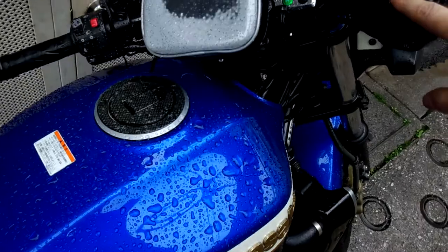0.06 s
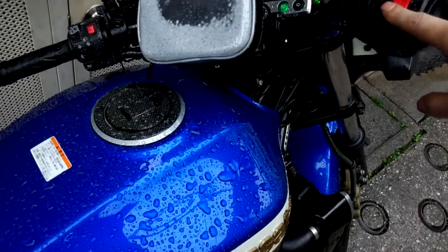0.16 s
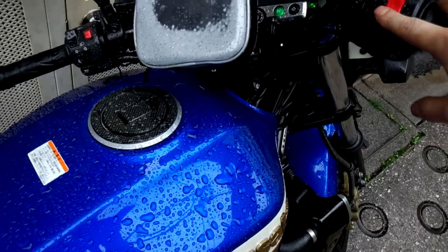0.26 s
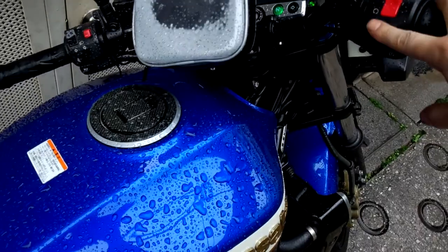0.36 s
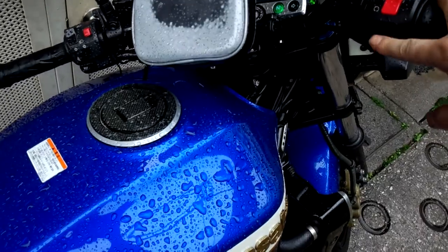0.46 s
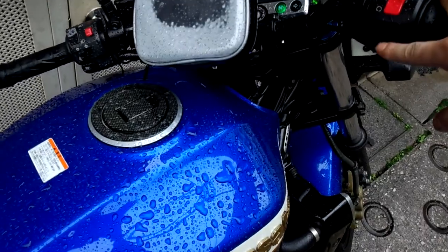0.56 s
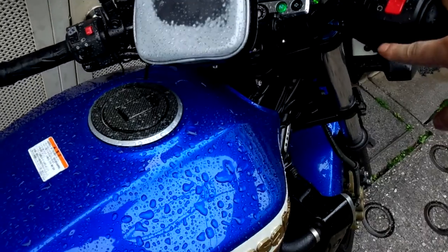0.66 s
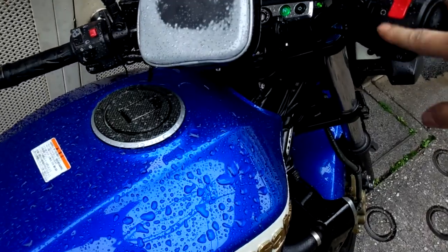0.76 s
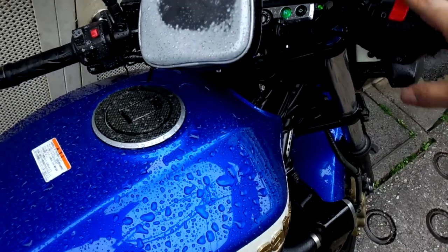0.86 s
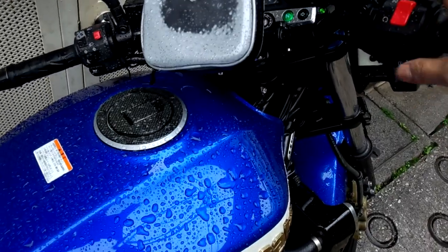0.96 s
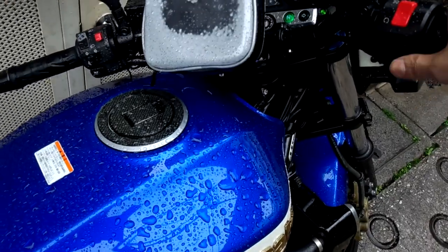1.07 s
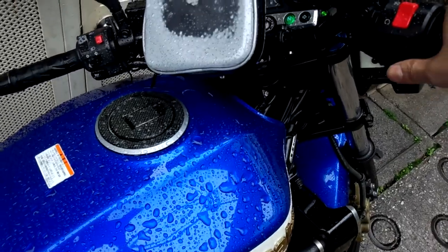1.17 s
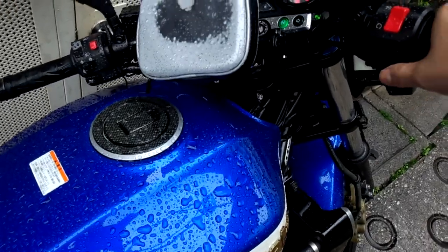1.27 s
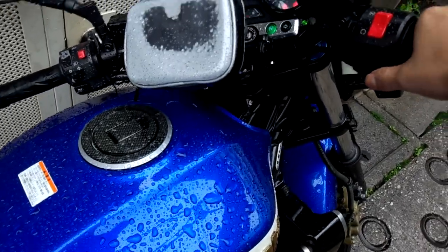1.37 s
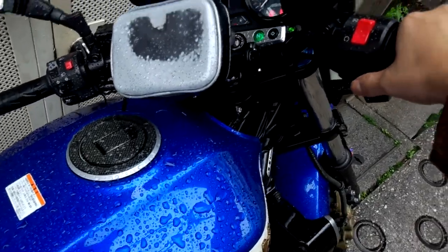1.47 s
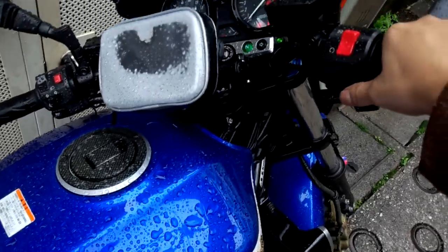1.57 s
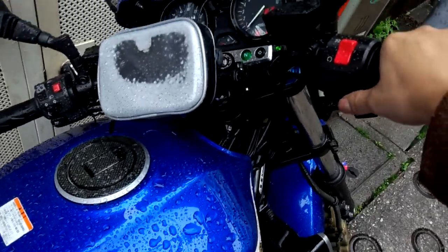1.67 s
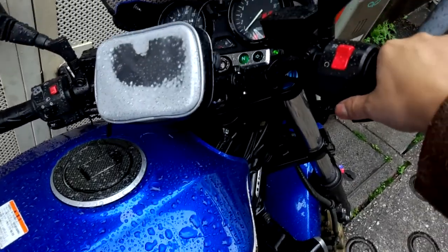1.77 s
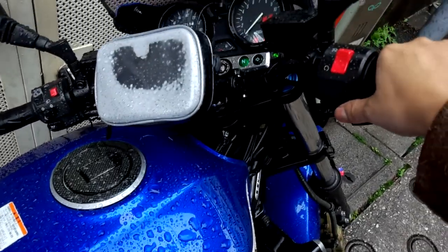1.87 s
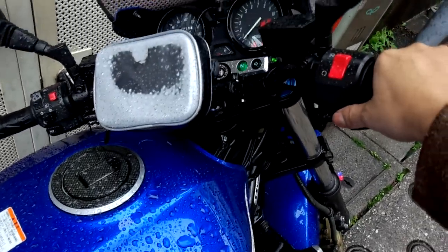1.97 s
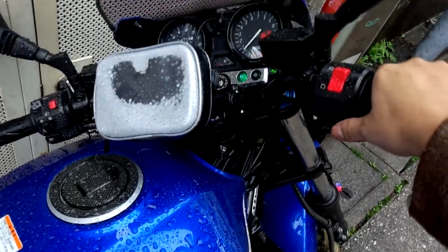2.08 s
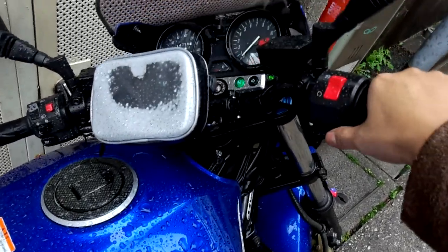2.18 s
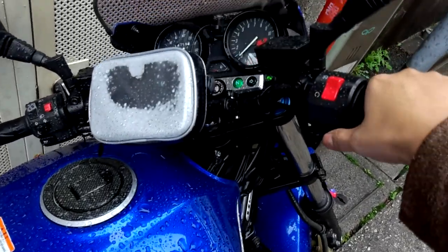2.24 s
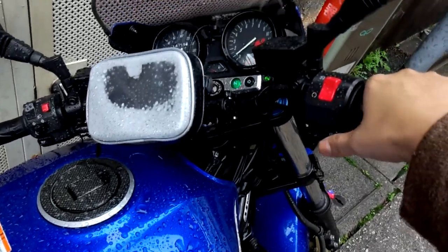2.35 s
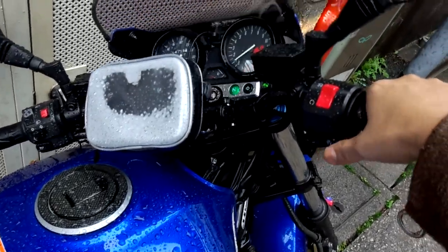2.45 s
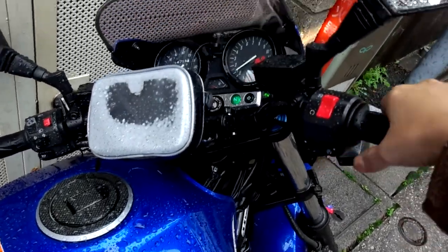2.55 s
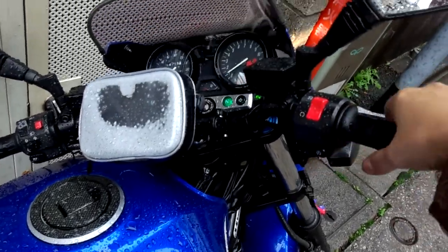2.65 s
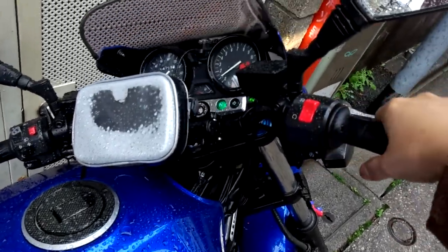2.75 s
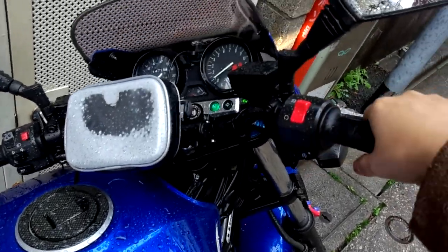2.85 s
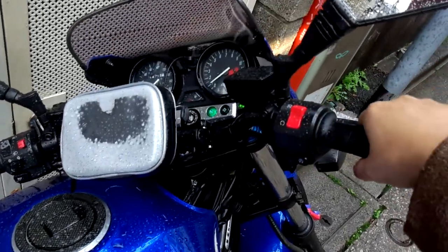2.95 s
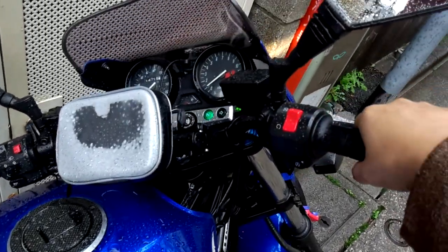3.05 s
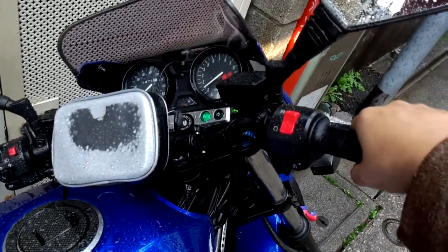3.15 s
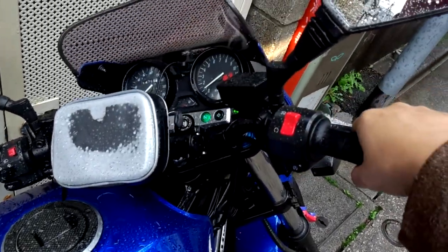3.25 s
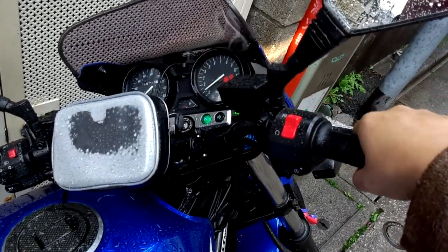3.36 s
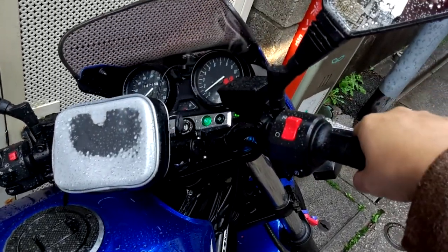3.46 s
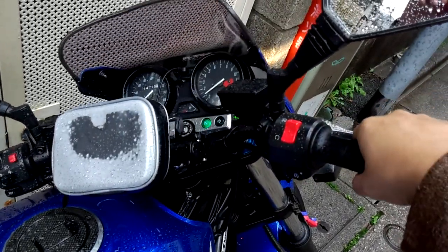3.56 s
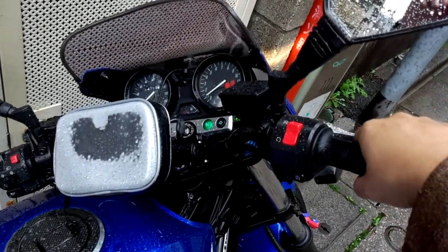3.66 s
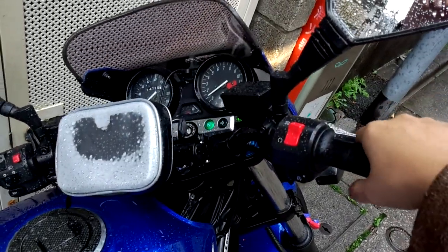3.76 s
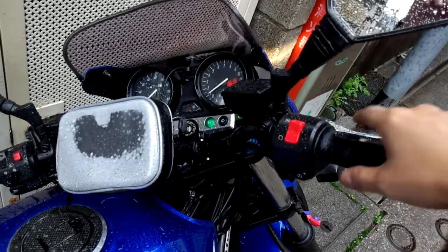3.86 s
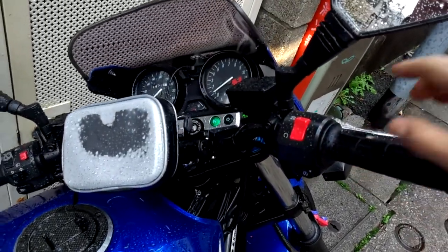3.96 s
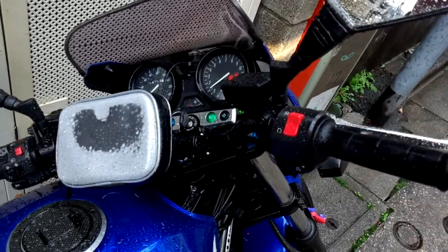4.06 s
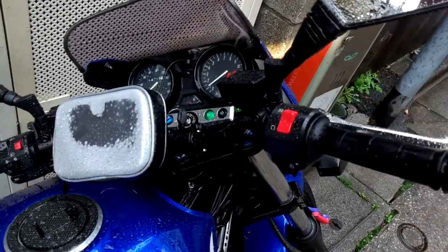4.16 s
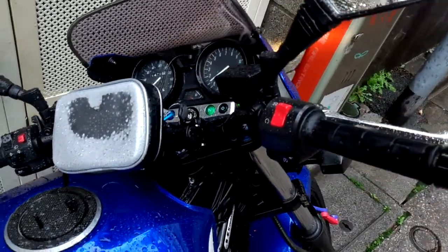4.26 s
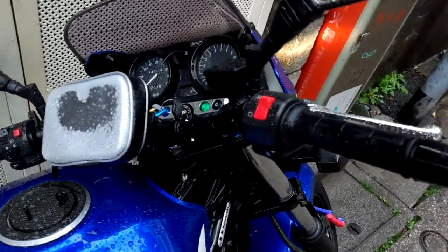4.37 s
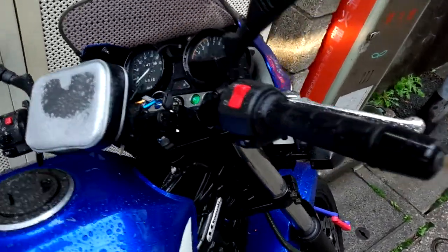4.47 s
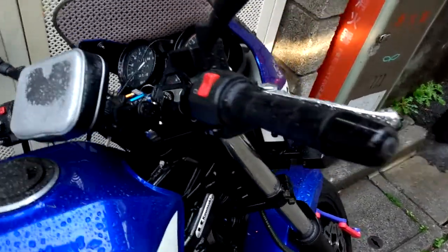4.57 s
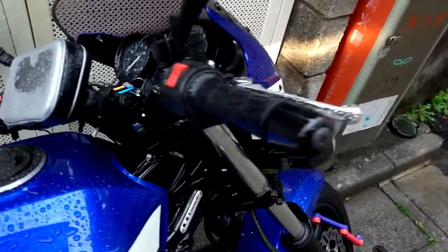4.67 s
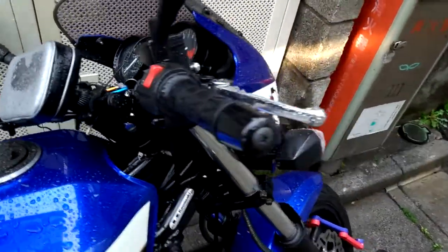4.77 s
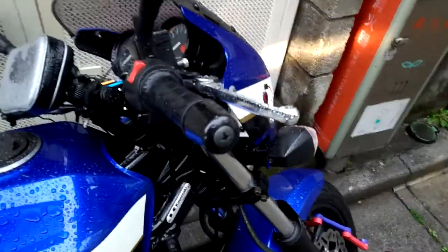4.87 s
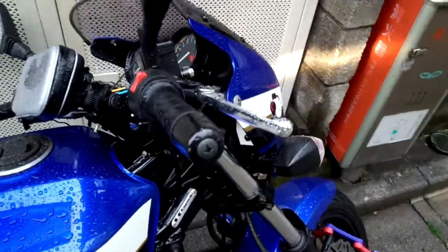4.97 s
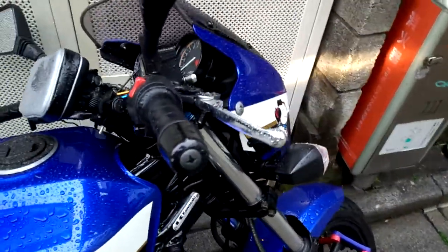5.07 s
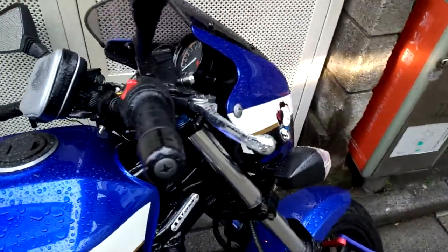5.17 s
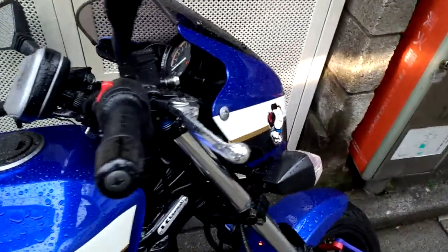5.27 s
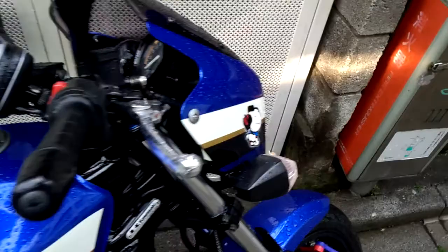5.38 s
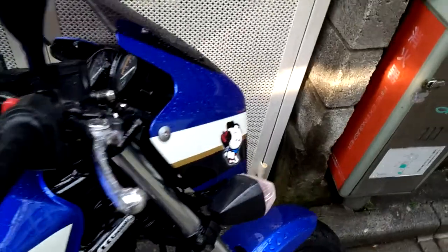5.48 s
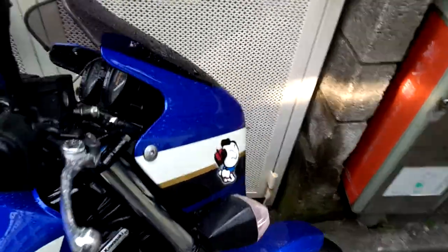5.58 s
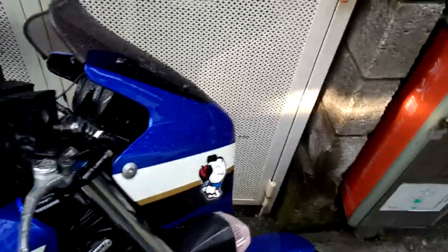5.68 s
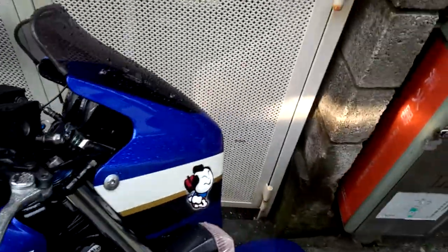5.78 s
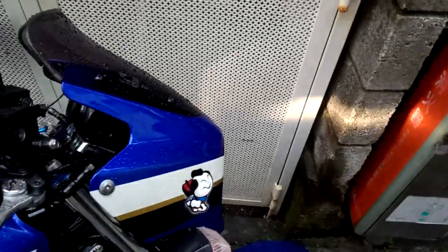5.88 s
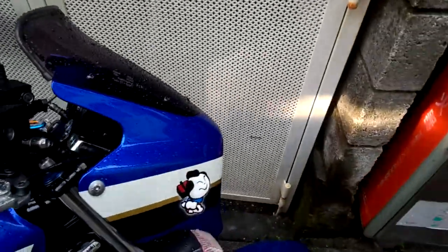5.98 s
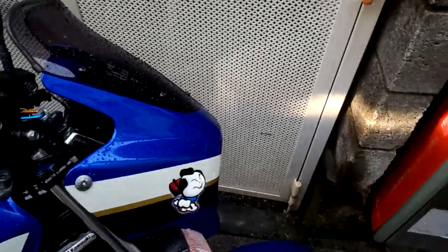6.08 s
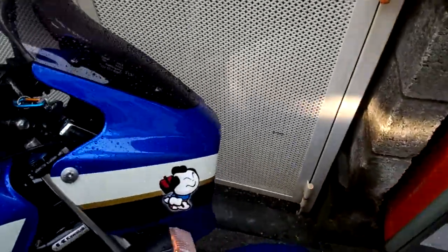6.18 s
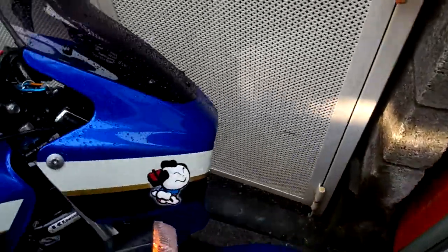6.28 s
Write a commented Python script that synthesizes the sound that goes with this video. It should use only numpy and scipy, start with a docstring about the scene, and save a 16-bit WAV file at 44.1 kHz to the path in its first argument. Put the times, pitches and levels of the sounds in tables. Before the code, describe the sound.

A switch clicks, a starter grinds and squeals briefly, and a cold motorcycle engine catches and idles lumpily with metallic clatter.

```python
"""Cold motorcycle start

A thumb clicks a handlebar switch over the rumble of far traffic. The starter grinds and squeals as
it forces the pistons round, and a cold four-cylinder engine catches and idles lumpily in a narrow
yard. Its firings puff gas down the pipe and shake the metal parts. The microphone moves from the
tank towards the front, and a phone's limiter turns the sound down on the strongest exhaust beats."""
import sys
import numpy as np
from scipy import signal
from scipy.fft import rfft, irfft
from scipy.io import wavfile
from scipy.ndimage import uniform_filter1d

SR = 44100
rng = np.random.default_rng(int(sys.argv[2]) if len(sys.argv) > 2 else 0)


def materialize(psi):
    """Save the field psi as 16-bit PCM at rate SR to the path in sys.argv[1].

    A 1-D psi becomes a single channel; in a 2-D psi each row is a channel.
    """
    bounded = np.clip(np.atleast_2d(psi).T, -1, 1)
    quanta = np.round(bounded * 32767).astype(np.int16)
    wavfile.write(sys.argv[1], SR, quanta)


N = 279153
T = np.arange(N) / SR

# Background loudness: (time [s], rumble [dB], hiss [dB])
YARD_LEVELS = [(.02, -39.5, -48.5), (.085, -37, -48.5), (.1, -52, -45), (.2, -39, -46), (.39, -39, -53),
               (1.15, -39.5, -53), (1.16, -39.5, -49.5), (1.2, -38.5, -52), (1.53, -37.5, -51),
               (1.6, -45, -57), (1.9, -38.5, -73)]
# Tone colour of the traffic and of the hiss: (frequency [Hz], relative level [dB])
RUMBLE_COLOUR = [(11, -64), (18, -1.5), (106, -4), (151, -12), (189, -12), (398, -17.5), (432, -23.5),
                 (640, -24.5), (695, -25), (928, -28), (2500, -43), (3250, -92), (5500, -120)]
HISS_COLOUR = [(470, -50), (800, -4), (1920, -6.5), (4650, -6), (5200, -7.5), (5970, -4), (6680, -5),
               (7290, -5), (9830, -7.5), (10200, -10.5), (15800, -14.5)]
# Switch and relay clicks: (time [s], level [dB], snap pitch [Hz], change to notes under 5 kHz [dB],
# push of air [dB], ringing against the snap [dB])
CLICKS = [(.088, -3.5, 6300, -2.5, -19, -1.5), (0.957, -28, 8700, -25, -70, -5),
          (1.043, -35, 8400, -21, -70, 2), (1.0667, -19, 9250, -25, -70, -12),
          (1.0669, -35, 5900, -25, -70, -12), (1.0669, -28, 2950, -20, -70, -10),
          (1.0715, -34, 3500, -15, -72, -8), (1.081, -35, 4870, 0, -72, 0),
          (1.157, -24.5, 9600, -22, -70, -3), (1.548, -10, 6460, -31, -19, 8),
          (5.4738, -11, 3700, -9, -68, -20), (5.474, -4.5, 7660, -5, -68, -16)]
# Notes of the plastic housing: (pitch [Hz], relative level [dB], time to fade by 60 dB [s])
HOUSING_NOTES = [(1010, -2.5, 0.029), (1235, 3.5, 0.02), (2080, 6.5, 0.0057), (4550, 8, 0.017),
                 (5880, -4, 0.026), (7060, -28, 0.017), (8140, -19, 0.0099)]
# The starter strains at each piston:
# (time [s], relative grind [dB], brush hiss [dB], hiss rise time [s], hiss fall [dB/s])
STROKES = [(1.547, -26.5, -25.5, 0.0087, 300), (1.612, -28.5, -22, 0.041, 350),
           (1.665, -31.5, -22.5, 0.0094, 320), (1.75, -35, -35.5, 0.14, 106),
           (1.814, -30, -20, 0.0056, 550), (1.91, -31.5, -21, 0.014, 800), (1.97, -41, -39, .02, 194)]
# Where the starter gears ring: (pitch [Hz], width [Hz], relative level [dB])
GEAR_BANDS = [(560, 75, -10), (1240, 360, 6), (1575, 400, -4), (2090, 120, -7), (2820, 2800, -1)]
# Tone colour of the motor's sliding brushes: (frequency [Hz], relative level [dB])
BRUSH_COLOUR = [(1470, -38), (2500, -11), (3310, -20), (3720, -4), (4620, -25), (5270, -9), (8140, -1.5),
                (8730, 3.5), (9360, -1.5), (12200, -4), (16000, -61)]
# Air pumped by the pistons: (time [s], level [dB])
THUD_LEVELS = [(1.55, -51), (1.612, -34), (1.65, -27.5), (1.687, -56), (1.8, -25), (1.843, -53),
               (1.909, -34), (1.933, -33.5)]
# Squeals of the starter's small gear: (start [s], length [s], first pitch [Hz], last pitch [Hz],
# glide [s], level [dB], loudest point [share of length], overtones against the main tone [dB])
SQUEALS = [(1.562, 0.018, 1265, 1270, .01, -17, .5, -30), (1.569, 0.031, 1306, 1710, 0.019, -26, .7, -30),
           (1.662, 0.057, 1438, 1250, 0.023, -18.5, 0.48, -16.5),
           (1.81, 0.03, 1464, 1230, 0.0173, -21.5, 0.49, -27),
           (1.893, 0.028, 1240, 1546, 0.013, -23.5, 1, -28)]
# Gear whistles: (start [s], length [s], pitch [Hz], level [dB])
WHISTLES = [(1.606, 0.026, 2230, -26), (1.608, 0.024, 1695, -30), (1.608, 0.025, 1122, -32),
            (1.593, .014, 2050, -31), (1.61, .06, 535, -42), (1.66, .02, 2120, -31),
            (1.734, 0.024, 3780, -34), (1.814, .014, 2170, -30), (1.832, 0.016, 2150, -28),
            (1.822, .012, 3780, -33), (1.965, 0.025, 3800, -36)]
# The microphone's path: (time [s], place [0 = tank, 1 = front])
MIC_PATH = [(2.0, 0.098), (4.1, 0.21), (4.7, 0.7), (5.4, 0.84), (6.3, 0.6)]
# A lope is one lurch of the idle, about eight firings. Each has its own boosts; the last row ends them:
# (start [s], throb [dB], firing tone [dB], pipe ring [dB], burble [dB])
LOPES = [(1.928, -5, -4.5, 4.5, 3.5), (2.143, -1, -4.5, 0, -1), (2.326, 2, 1.5, 3.5, -1.5),
         (2.531, -7.5, -11, 5, -3), (2.599, -4, -0.5, -1.5, -2), (2.81, 0, 2, 0.5, -0.5),
         (3.022, 1, 0, 2, 0.5), (3.227, 0.5, -1, 0, 2.5), (3.43, 2, -0.5, 2.5, 1.5),
         (3.635, 3, 1.5, 1, 1.5), (3.838, 4.5, 0.5, 4, 2), (4.049, 2.5, 1, 2.5, 4), (4.247, 1.5, 0, 1.5, 2),
         (4.447, 0, -1.5, -0.5, -0.5), (4.646, 1.5, 0, -4, 5), (4.858, 0.5, 1, -4, 4),
         (5.075, 1.5, 2, -7, 4.5), (5.283, 2, 2.5, -2, 7), (5.503, 1, -0.5, -2.5, 3.5),
         (5.689, 1, -4, -12, 2), (5.897, -7, -6, -7, 0), (6.112, -3, -5.5, -4.5, 0), (6.32, -7, 0, -3, -2)]
# The shape of one lope soon after catching and once the idle settles: (time into it [s], throb [Hz],
# firing tone [Hz], throb [dB], firing tone [dB], pipe ring [dB], burble [dB], clatter boost [dB])
LOPE_EARLY = [(0, 35, 77.5, -23.5, -21, -19.5, -27.5, 1.7), (.02, 35, 76.5, -25, -31, -24.5, -31.5, -0.3),
              (.045, 32.6, 78.3, -15, -15.5, -24.5, -27, 3),
              (.075, 38.7, 81.96, -17, -18.5, -22.5, -28.5, 3.5),
              (.105, 45.2, 82, -20.5, -21, -27.5, -21.5, 2.6), (.135, 45, 86, -25, -19.5, -28, -26.5, 1),
              (.16, 42.2, 81.5, -17.5, -17, -30, -32, 0), (.185, 39.8, 81.1, -14, -22.5, -27.5, -36.5, -3)]
LOPE_SETTLED = [(0, 35, 81.5, -24, -29.5, -20.5, -49, 0.5),
                (.02, 34.7, 79.4, -16.5, -26.5, -20.5, -36.5, -1),
                (.05, 29.8, 77, -14.5, -17, -22.5, -29.5, 6), (.08, 34.4, 79.07, -19.5, -16, -38, -30, 5),
                (.105, 40.4, 79.33, -18.5, -16, -20, -28.5, 5),
                (.135, 41.5, 81.5, -25.5, -19, -29, -29, 0.5),
                (.16, 40.5, 82.53, -21, -17, -19.5, -29.5, 3),
                (.185, 42.4, 82.05, -24.5, -18, -22.5, -34, 1.1)]
# The pipe's ring as the engine catches: (time [s], pitch [Hz], level [dB])
FIRST_BURNS = [(1.95, 96, -15), (1.975, 124, -27), (1.99, 127, -17), (2.015, 109, -29), (2.044, 107, -24),
               (2.06, 106.3, -20), (2.084, 103, -16.5), (2.138, 109, -32), (2.166, 106, -18.5),
               (2.19, 109, -28.5), (2.236, 107, -17.5), (2.276, 102, -22), (2.32, 103.5, -15.5)]
# The cold engine stumbles: (time [s], half length [s], dip [dB])
MISFIRES = [(2.13, 0.038, -9), (2.342, 0.023, -9), (2.509, 0.028, -16.5)]
# Tone colour of the puffs at the tank and at the front: (frequency [Hz], relative level [dB])
PUFF_COLOUR_TANK = [(74, -17.5), (125, -5), (146, -9), (200, -5.5), (250, -7), (295, -7.5), (357, -23),
                    (407, -19), (454, -32.5), (538, -32), (800, -31.5), (1040, -49), (1760, -120)]
PUFF_COLOUR_FRONT = [(100, -0.5), (175, 1), (215, -5), (245, -15), (295, -17), (340, -16), (405, -21.5),
                     (529, -29), (751, -53), (800, -62), (1040, -58), (1760, -120)]
# Relative clatter loudness, heard from a moving hand: (time [s], cases [dB], valves [dB])
CLATTER_LEVELS = [(1.93, -43, -40), (2.14, -39, -34.5), (2.3, -40.5, -37.5), (2.63, -42, -41),
                  (4.12, -39, -36.5), (4.39, -37.5, -35.5), (4.55, -40, -39.5), (4.69, -36.5, -38),
                  (4.85, -37, -37), (5.2, -36.5, -36), (5.32, -33.5, -34), (5.52, -35, -38),
                  (5.95, -40.5, -42), (6.33, -38.5, -42.5)]
# Where the engine cases ring: (pitch [Hz], width [Hz], weight at tank [dB], weight at front [dB])
CASE_BANDS = [(565, 300, 4.5, -3.5), (946, 32, -22, -0.5), (1156, 404, 8, 1), (1496, 330, -0.5, 2),
              (1850, 105, -7, -0.5), (2120, 180, -8, -1), (2340, 110, -24.5, 1), (3250, 1300, 12, -59)]
# Where the valve parts ring: (pitch [Hz], width [Hz], relative level [dB])
VALVE_BANDS = [(4440, 2000, 1), (6570, 2200, -1.5), (8235, 690, 3.5), (8794, 170, 2.5), (12350, 2800, 4.5)]
# A cover rings in flares: (time [s], relative level [dB], pitch [Hz])
COVER_FLARES = [(1.98, -40, 3860), (2.0, -38.5, 3780), (2.13, -36, 3900), (2.16, -33, 3920),
                (2.24, -37, 3900), (2.31, -45, 3970), (2.42, -34, 3920), (2.45, -50, 3970),
                (2.52, -42, 3960), (2.85, -43.5, 3690), (2.92, -35, 3930), (3.0, -50, 3820),
                (3.03, -35, 3800), (3.2, -45, 3870), (3.26, -40, 3880), (3.72, -42.5, 3803),
                (3.77, -31, 3900), (3.82, -48, 3940), (3.93, -33, 3880), (4.04, -41, 3900),
                (4.06, -35, 3830), (4.28, -41, 3990), (4.39, -31.5, 3770), (4.58, -36, 3780),
                (4.6, -44, 3700), (4.71, -31.5, 3800), (4.73, -46, 3850), (4.81, -49, 3750),
                (4.91, -32, 3840), (4.92, -36, 3680), (5.11, -33.5, 3780), (5.25, -35, 3940),
                (5.32, -30.5, 3600), (5.41, -37, 3900), (5.54, -36.5, 3740), (5.71, -44, 3830),
                (5.74, -37, 3790), (5.92, -48, 3900), (5.94, -42, 3900), (6.14, -51, 3680),
                (6.17, -37.5, 3840), (6.33, -46, 4000)]
# The loudest metal knocks: (time [s], level [dB], pitch [Hz])
KNOCKS = [(1.985, -28, 422), (2.04, -30, 400), (2.28, -32, 1110), (2.305, -30, 1465), (2.4947, -28.5, 1530),
          (2.5548, -35, 1930), (2.582, -29, 1340), (2.705, -32, 1220), (2.7608, -29, 1680),
          (2.812, -27, 1370), (2.8419, -31, 1590), (2.915, -29, 1280), (2.9711, -30, 1320),
          (3.021, -29, 1020), (3.1273, -30, 1280), (3.1774, -33, 1020), (3.331, -31, 1210),
          (3.3833, -25, 1525), (3.416, -31, 1820), (3.486, -30, 960), (3.5356, -26, 1170),
          (3.581, -29, 1000), (3.741, -24.5, 1240), (3.79, -27, 1830), (3.945, -31, 1260),
          (4.0003, -23, 1510), (4.154, -24, 1500), (4.2315, -20.5, 1530), (4.353, -22.5, 1190),
          (4.4055, -20.5, 1570), (4.5025, -21, 1420), (4.555, -27, 1135), (4.6475, -25, 1820),
          (4.681, -28, 1830), (4.74, -32, 1440), (4.9896, -22, 1500), (5.065, -23, 1910),
          (5.245, -27, 2080), (5.11, -27, 1800), (5.1577, -29, 2420), (5.1813, -22.5, 1470),
          (5.2044, -23, 1160), (5.2899, -23, 1900), (5.3152, -22, 1430), (5.556, -25, 1510),
          (5.572, -26, 925), (5.73, -28, 1900), (5.8997, -27, 1650), (6.1098, -30, 1880)]
# Sharp exhaust pops: (time [s], relative level [dB])
POPS = [(2.253, -39), (2.305, -32), (2.358, -30), (2.584, -29), (2.684, -41), (2.795, -38), (3.588, -25),
        (3.793, -25), (4.232, -27), (5.077, -24), (5.113, -24), (5.209, -35), (5.669, -33), (6.171, -33)]

CRANK_ON_S, CRANK_OFF_S = 1.542, 2.0
CATCH_S, BUILD_S = 1.93, 0.055  # the first burn; time the exhaust takes to build
LOPE_S = 0.2  # shorter lopes are squeezed to fit
THROB_BEAT_S, FIRING_BEAT_S, RING_BEAT_S = 0.059, 0.0875, 0.03693  # each tone's strong beat in a lope
LIMIT_DB, RECOVERY_DB_PER_S, TREBLE_EDGE_HZ = -11.7, 44.5, 15800


def amp(db):
    """Turns decibels into a number to multiply by."""
    return 10 ** (np.asarray(db) / 20)


def evened(x):
    """Scales a signal to an average strength (rms) of 1."""
    return x / np.sqrt(np.mean(x ** 2) + 1e-20)


def noise(shape=N):
    """Plain white noise."""
    return rng.standard_normal(shape)


def lowpass(x, hz, order=2):
    """Keeps what lies under hz."""
    return signal.sosfilt(signal.butter(order, hz, fs=SR, output="sos"), x)


def wobble(hz, order=2):
    """A random curve that wanders no faster than about hz."""
    return evened(lowpass(noise(), hz, order))


def curves(rows):
    """Joins a table's rows over time, giving one curve for each column after the first."""
    times, *rest = np.transpose(rows)
    return [np.interp(T, times, column) for column in rest]


def colour(x, points):
    """Gives x a tone colour that rings only after each blow, never before it."""
    point_hz, db = np.transpose(points)
    hz = np.fft.rfftfreq(N, 1 / SR) + 1
    log_gain = np.log(amp(np.interp(np.log(hz), np.log(point_hz), db, db[0] - 21.5, db[-1] - 19)))
    only_after = np.r_[1, 2 * np.ones(N // 2), np.zeros(N - 1 - N // 2)]
    response = np.exp(rfft(irfft(log_gain, N) * only_after))
    return evened(irfft(rfft(x) * response, N))


def ring(x, bands):
    """Lets x ring in bands of (pitch [Hz], width [Hz], relative level [dB])."""
    return evened(sum(amp(db) * evened(signal.lfilter(*signal.iirpeak(hz, hz / width, SR), x))
                      for hz, width, db in bands))


def add(mix, start_s, sound):
    """Mixes a sound in at a given time."""
    part = mix[round(start_s * SR):][:len(sound)]
    part += sound[:len(part)]


def yard():
    """Far traffic rumbles unevenly under a faint hiss."""
    rumble_db, hiss_db = curves(YARD_LEVELS)
    lumps = amp(0.8 * evened(uniform_filter1d(noise(), 3000)))
    rumble = amp(rumble_db) * lumps * colour(noise(), RUMBLE_COLOUR)
    return rumble + amp(hiss_db) * colour(noise(), HISS_COLOUR)


def clicks():
    """Each snap rings the plastic housing, rattles briefly and may push air at the microphone."""
    out, t = np.zeros(N), T[:SR // 2]
    for start, db, snap_hz, dull_db, push_db, ring_db in CLICKS:
        housing = sum(amp(level + dull_db * (hz < 5000) - 60 * t / fade_s)
                      * np.sin(2 * np.pi * (hz * t + rng.random()))
                      for hz, level, fade_s in HOUSING_NOTES)
        snap = -np.cos(2 * np.pi * snap_hz * (t - 0.00041)) * np.exp(-((t - 0.0004) * snap_hz) ** 2)
        rattle = ring(noise(len(t)), [(0.95 * snap_hz, 1200, 0), (1.31 * snap_hz, 2500, 0)])
        ringing = 0.12 * rattle * np.exp(-t / 0.0075) + 0.18 * housing
        push = np.minimum(t / 0.00049, 1) * np.cos(2 * np.pi * 2.8 * t) * np.exp(-t / 0.15)
        add(out, start, amp(db) * (snap + amp(ring_db) * ringing) + amp(push_db) * push)
    return out


def starter():
    """Gears grind and brushes hiss, loudest as each piston is forced to squeeze its air."""
    grind_db, hiss_db = -50, -39.5  # between strokes
    for peak_s, grind, hiss, rise_s, fall in STROKES:
        drop_db = 9.5 * np.maximum(peak_s - T, 0) / rise_s + fall * np.maximum(T - peak_s, 0)
        grind_db = np.maximum(grind_db, grind - 0.43 * drop_db)
        hiss_db = np.maximum(hiss_db, hiss - drop_db)
    thud = amp(curves(THUD_LEVELS)[0]) * wobble(35, order=4)
    teeth, sliding = noise((2, N)) * amp(0.49 * evened(uniform_filter1d(noise(), 60)))
    gears = amp(grind_db + 4.5) * ring(teeth - lowpass(teeth, 620, order=1), GEAR_BANDS)
    brushes = amp(hiss_db) * colour(sliding, BRUSH_COLOUR)
    on = np.clip((T - CRANK_ON_S) / 0.0051, 0, 1) * np.clip((CRANK_OFF_S - T) / 0.0065, 0, 1)
    return on * (gears + brushes + thud)


def squeals():
    """The starter's small gear sticks and slips, adding overtones at 3, 5 and 7 times its pitch."""
    out = np.zeros(N)
    for start, length, first_hz, last_hz, glide_s, db, peak, odd_db in SQUEALS:
        t = T[:round(length * SR)]
        glide = np.minimum(t / glide_s, 1) ** 2
        phase = 2 * np.pi * np.cumsum(first_hz + (last_hz - first_hz) * glide) / SR
        overtones = sum(amp(level) * np.sin(k * phase) for k, level in [(3, 0), (5, -1), (7, -2)])
        edges = np.clip(np.minimum(t, length - t) / 0.0059, 0, 1)
        swell = np.sqrt(2) * amp(db - 5 * abs(t / length - peak))
        add(out, start, edges * swell * (np.sin(phase) + amp(odd_db) * glide * overtones))
    return out


def whistles():
    """The turning gears give short, pure whistles."""
    out = np.zeros(N)
    for start, length, hz, db in WHISTLES:
        t = T[:round(length * SR)]
        edges = signal.windows.tukey(len(t), 0.5)
        add(out, start, np.sqrt(2) * amp(db) * edges * np.sin(2 * np.pi * hz * t))
    return out


def repeat_lope(shape):
    """Repeats the shape of one lope through the idle, adding each lope's own boosts."""
    rows = []
    for (start, *boosts), (end, *_) in zip(LOPES, LOPES[1:]):
        squeeze = min((end - start) / LOPE_S, 1)
        for s, throb_hz, tone_hz, *levels, clatter_db in shape:
            rows.append((start + s * squeeze, throb_hz, tone_hz, *np.add(levels, boosts), clatter_db))
    return np.array(curves(rows))


def in_step(hz, beat_s):
    """Counts a tone's cycles, slipping between lopes so that it peaks on each lope's beat."""
    cycles = np.cumsum(hz) / SR
    beats = np.array([row[0] for row in LOPES[:-1]]) + beat_s
    at_beat = np.interp(beats, T, cycles)
    whole = np.cumsum(np.round(np.diff(at_beat, prepend=0) - 0.1))
    held_s = np.ravel([beats - 0.04, beats + 0.065], "F")  # no slipping this close to a beat
    return cycles - np.interp(T, held_s, np.repeat(at_beat - whole, 2))


def blend(a, b, share):
    """Slides from a (share 0) to b (share 1)."""
    return (1 - share) * a + share * b


def exhaust_tones(firings, place, throb_hz, throb_db, tone_db, pipe_db):
    """The exhaust throbs, hums at multiples of the firing rate and rings the pipe; misfires dip it."""
    caught = np.clip((T - FIRST_BURNS[-1][0]) / 0.022, 0, 1)
    early_hz, early_db = curves(FIRST_BURNS)
    pipe_hz, pipe_db = blend(early_hz, 106.53, caught), blend(early_db, pipe_db, caught)
    misfire_db = sum(db * np.exp(-((T - s) / half) ** 2) for s, half, db in MISFIRES)
    throb_db, tone_db, pipe_db = [db + misfire_db + 1.3 * wobble(hz=41.67)
                                  for db in (throb_db, tone_db, pipe_db)]
    tones = [(throb_db, in_step(throb_hz, THROB_BEAT_S)),
             (pipe_db, in_step(pipe_hz, RING_BEAT_S)),
             (tone_db, 2 * firings),
             (tone_db + blend(-29.5, -13.5, place), 4 * firings),
             (tone_db + blend(-36, -18, place), 5 * (firings - 0.044))]
    return sum(np.sqrt(2) * amp(db) * np.cos(2 * np.pi * cycles) for db, cycles in tones)


def exhaust_burble(firings, place, settled):
    """Each firing sends out a puff of uneven strength, mixed with the rush of swirling gas."""
    lag = blend(0.5, 0.75, settled)  # share of a firing by which the puff trails the tone
    puffs = np.diff(np.floor(firings - lag), prepend=-1) * amp(1.85 * noise())
    gas = evened(puffs) + blend(0.7, 0.4, settled) * noise()
    return blend(colour(gas, PUFF_COLOUR_TANK), amp(1) * colour(gas, PUFF_COLOUR_FRONT), place)


def clatter(firings, place, boost_db):
    """Firings and the ticks of loose valve parts shake the cases, the valves and a cover."""
    pulse = 1 + 0.084 * np.cos(2 * np.pi * (firings - 0.3))
    hits = rng.random((2, N)) < 400 / SR  # about 400 ticks a second in each row
    case_ticks, valve_ticks = hits * amp(4.1 * np.minimum(rng.exponential(1, (2, N)), 3))
    case_shake = pulse * noise() + 0.57 * evened(case_ticks)
    flaring_bands = [(hz, width, blend(tank_db, front_db, place) + 2 * wobble(hz=20))
                     for hz, width, tank_db, front_db in CASE_BANDS]
    cases = ring(case_shake, flaring_bands)
    valve_shake = pulse * noise() + 0.5 * evened(valve_ticks)
    valves = lowpass(ring(valve_shake, VALVE_BANDS), 12060, order=8)
    cases_db, valves_db = curves(CLATTER_LEVELS) + boost_db + 3
    return amp(cases_db) * cases + amp(valves_db) * valves + cover(noise() + 0.24 * evened(valve_ticks))


def cover(shake, width_hz=300):
    """A shaken cover rings in a narrow band around a wandering pitch."""
    db, hz = curves(COVER_FLARES)
    spin = np.exp(2j * np.pi * np.cumsum(hz) / SR)
    band = spin * lowpass(shake / spin, width_hz / 2)  # shift down to 0 Hz, filter, shift back
    return amp(db - 2.5) * evened(band.real)


def engine():
    """One firing rhythm drives the exhaust and the clatter, heard from the moving microphone."""
    place = np.clip(curves(MIC_PATH)[0], 0, 1)
    settled = np.maximum.accumulate(place)  # the idle settles into its later rhythm and stays there
    lope = blend(repeat_lope(LOPE_EARLY), repeat_lope(LOPE_SETTLED), settled)
    throb_hz, tone_hz, throb_db, tone_db, pipe_db, burble_db, clatter_db = lope
    firings = in_step(tone_hz / 2, FIRING_BEAT_S)  # counts up by one at each firing
    tones = exhaust_tones(firings, place, throb_hz, throb_db, tone_db, pipe_db)
    burble = amp(burble_db) * exhaust_burble(firings, place, settled)
    running = np.clip((T - CATCH_S) / 0.0059, 0, 1)
    build = np.clip((T - CATCH_S) / BUILD_S, 0, 1) ** 2
    return running * (build * (tones + burble) + clatter(firings, place, clatter_db))


def knocks(decay_s=0.0055):
    """Knocked metal gives a short note with some grit in it."""
    out, t = np.zeros(N), T[:SR // 25]
    shape = np.minimum(t / 0.00094, 1) * np.exp(-t / decay_s)
    for start, db, hz in KNOCKS:
        grit = ring(noise(len(t)), [(hz, 300, 0), (hz * 1.5, 900, -3)])
        add(out, start, amp(db) * shape * (np.sin(2 * np.pi * hz * t) + 0.4 * grit))
    return out


def pops(hz=680, decay_s=0.0012):
    """The exhaust pops: a crack of noise and a note that die almost at once."""
    out, t = np.zeros(N), T[:SR // 25]
    for start, db in POPS:
        crack = amp(3) * lowpass(noise(len(t)), 3500)
        add(out, start, amp(db + 4.5) * np.exp(-t / decay_s) * (crack - np.sin(2 * np.pi * hz * t)))
    return out


def scene():
    """All the sounds meet at one microphone."""
    return (engine() + knocks() + pops() + starter() + squeals() + whistles() + clicks() + yard())[None]


def record(dry):
    """The phone turns loud peaks down fast, comes back up steadily and cuts the highest treble."""
    peak_db = 20 * np.log10(abs(uniform_filter1d(dry[0], 20)) + 1e-6)
    recovery_db = T * RECOVERY_DB_PER_S
    held_db = np.maximum.accumulate(peak_db + recovery_db) - recovery_db
    over_db = np.maximum(held_db - LIMIT_DB, 0)
    limited = dry / amp(uniform_filter1d(over_db, 60))
    treble_cut = signal.firwin(511, TREBLE_EDGE_HZ, window=("kaiser", 9), fs=SR)
    return signal.oaconvolve(limited, treble_cut[None], "same")


dry = scene()
out = record(dry)
materialize(out)
```